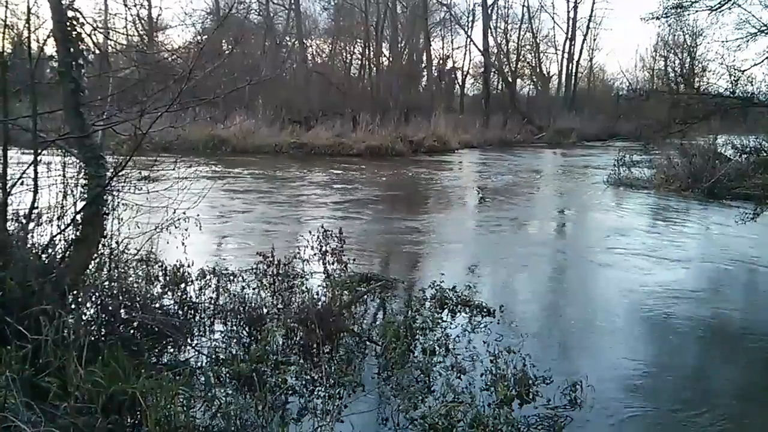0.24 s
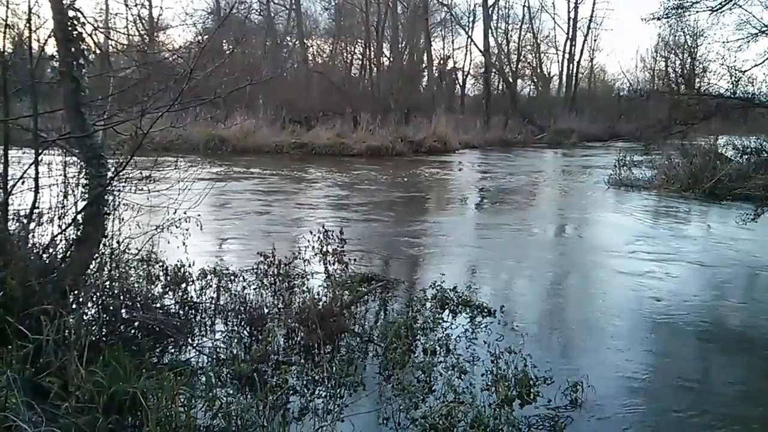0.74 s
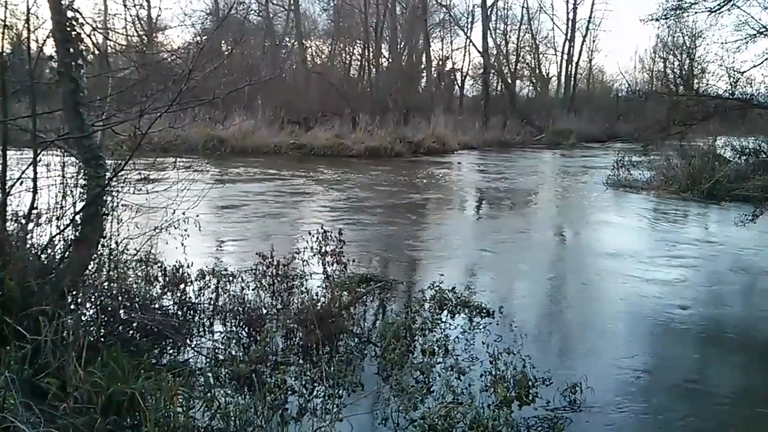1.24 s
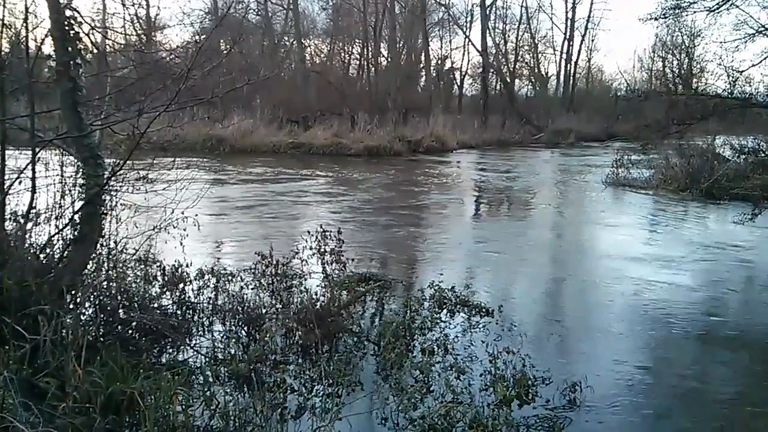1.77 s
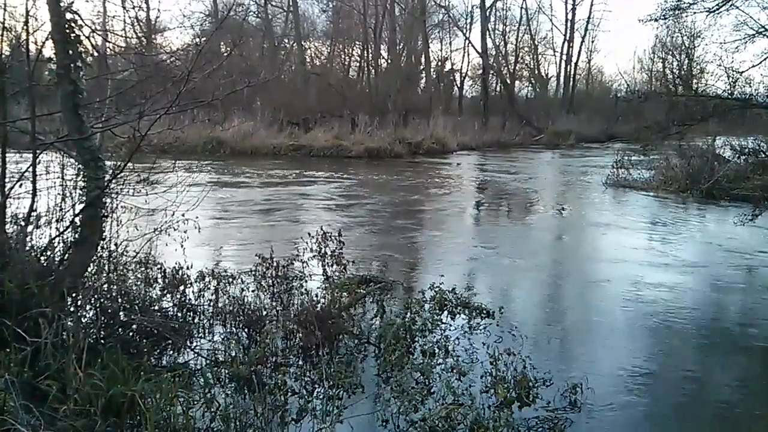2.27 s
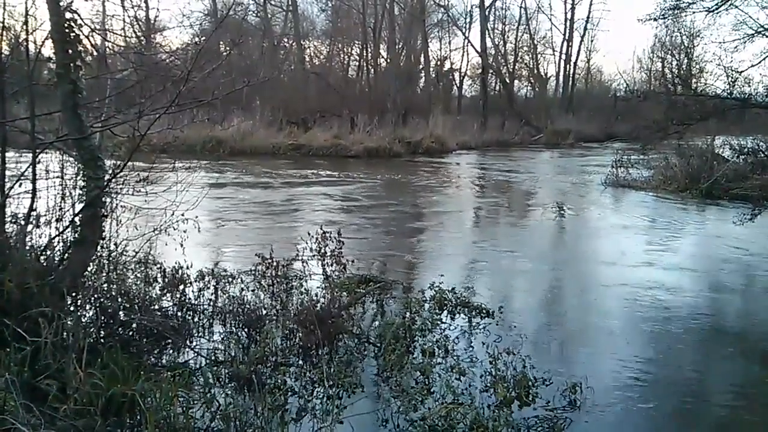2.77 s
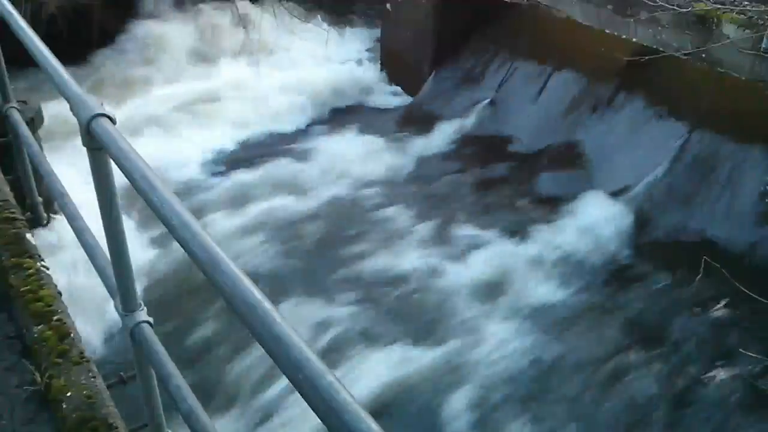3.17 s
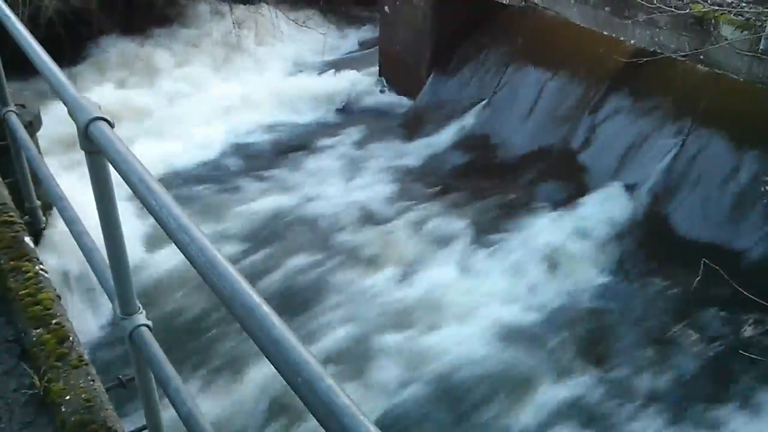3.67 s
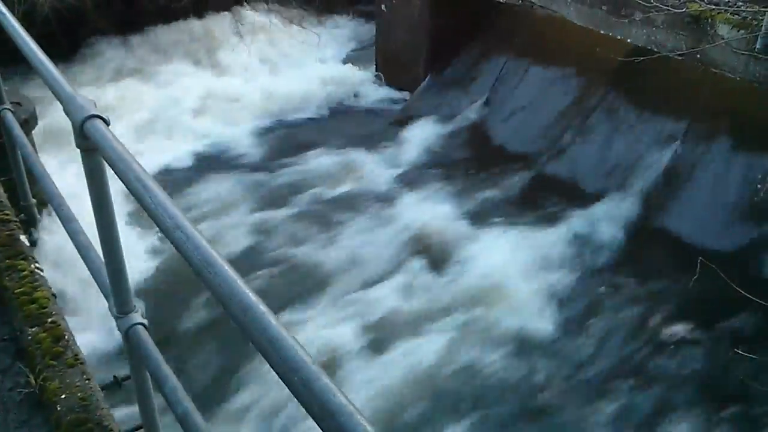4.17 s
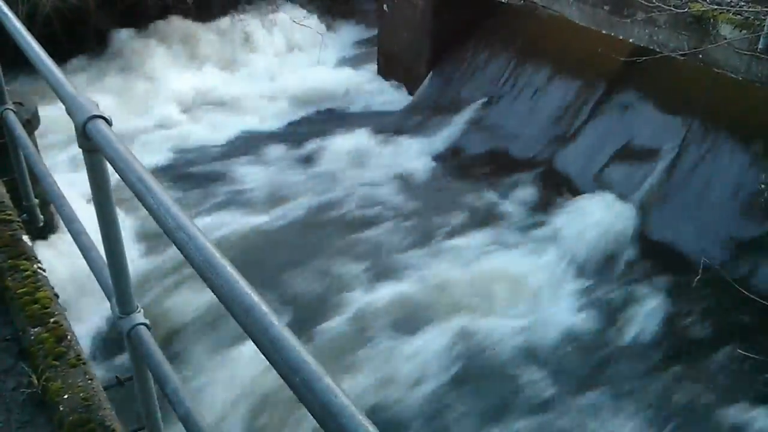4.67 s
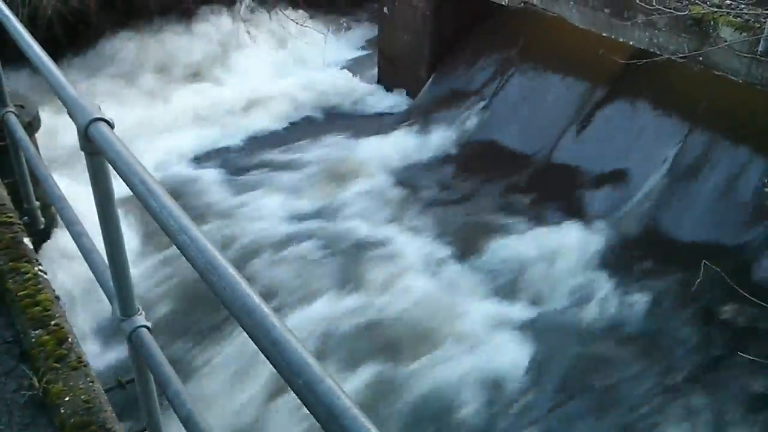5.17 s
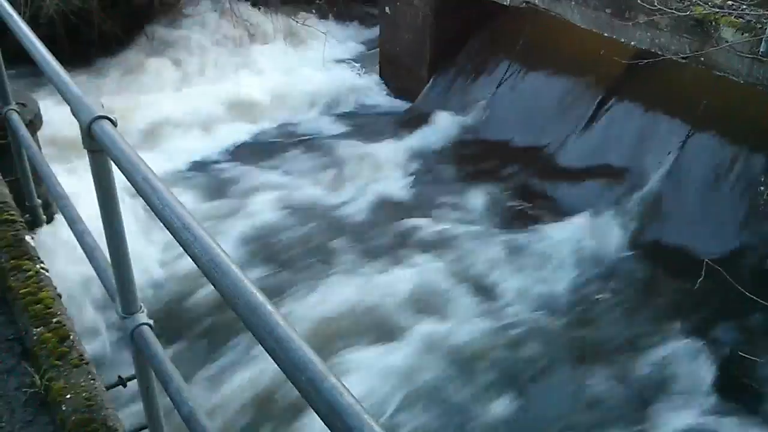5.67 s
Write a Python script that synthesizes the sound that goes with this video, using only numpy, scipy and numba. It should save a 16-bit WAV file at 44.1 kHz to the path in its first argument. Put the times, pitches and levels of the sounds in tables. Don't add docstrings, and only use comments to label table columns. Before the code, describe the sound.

Low, muffled rumble of a distant weir across a calm flooded river, brief total silence, then loud churning white water close by, turning thinner and hissier.

```python
import sys
import numpy as np
from scipy import signal
from scipy.io import wavfile
from scipy.ndimage import uniform_filter1d, map_coordinates
from numba import njit

SR = 44100
rng = np.random.default_rng(int(sys.argv[2]) if len(sys.argv) > 2 else 0)


def ratio(d):
    e = np.asarray(d, float) / 20
    return 10 ** e


def persist_wave(psi):
    counts = np.round(np.clip(psi, -1, 1) * 32767).astype(np.int16)
    wavfile.write(sys.argv[1], SR, np.atleast_2d(counts).T)


N = 261072

BAND_EDGES = [80, 330, 2000, 6000, 15500]
# pitch_hz, density_db (per Hz)
FAR_COLOUR = [(15, -62.5), (25, -23.5), (107, 2), (140, 3), (296, 1), (420, -3.5), (801, -6.5),
              (1110, -15.5), (1330, -16), (2000, -22), (3150, -34), (4240, -27.5), (8080, -18.5),
              (13500, -28), (15400, -35.5)]
NEAR_COLOUR = [(15, -53), (25, -23), (86, -12.5), (140, -3.5), (266, -2), (388, -7.5), (494, -3.5),
               (719, -6), (941, -3), (1140, -5.5), (1610, -4), (2830, -11.5), (5550, -2.5), (10900, -9),
               (15400, -14)]
CLAMPED_COLOUR = [(15, -64), (25, -26), (140, -4.5), (313, -1), (388, -7), (739, -2.5), (1200, -10.5),
                  (1370, -8.5), (1840, -11.5), (2050, -10.5), (2830, -17.5), (4600, -13.5), (7450, -3),
                  (9000, -2), (15400, -11.5)]
# rumble_db, roar_db, rush_db, spray_db
STEADY = [
    (-31, -26, -35.5, -30.5),
    (-22.5, -14.5, -14.5, -15.5),
    (-29, -22.5, -24.5, -15),
]
# centre_s, level_db
HEAVES = [(.19, -1), (.26, 3), (.52, 1), (.64, 4), (.78, 5.5), (.97, 0.5), (1.14, 0.5), (1.36, 1),
          (1.53, 4), (1.65, 4), (1.9, 2), (2.07, 2), (2.43, 3), (3.36, 0.5), (3.52, 1), (3.87, -2),
          (3.96, 2.5), (4.66, 4), (4.77, -2), (4.84, 4), (4.93, 5.5), (5.44, -2), (5.54, -3.5), (5.74, 4.5)]
# centre_s, level_db
SURGES = [(.05, -0.5), (.4, -1.5), (.6, 1.5), (.97, 1.5), (1.6, -2.5), (1.8, 2.5), (3.16, 1.5), (3.99, 1.5),
          (4.07, -0.5), (4.74, -1), (4.9, 0), (5.6, -1)]
# centre_s, level_db, length_s
GUSTS = [(.08, 2, 0.075), (0.302, -1.5, 0.11), (0.696, 1.5, .06), (0.91, -3, 0.046), (1.35, 1.5, 0.039),
         (1.595, -1, .05), (1.84, -4, 0.066), (2.182, 0.8, 0.076), (2.4, -0.5, .04), (3.45, -1, 0.13),
         (3.99, 0.7, .06), (4.402, -1, 0.15), (4.684, 0.5, 0.043)]
# crossover_hz, overlap_octaves
CROSSOVER = [
    (3350, .6),
    (3380, 0.53),
    (3120, .85),
]
WANDER = [.32, .27, .18]
# pitch_hz, level_db
WIDTH = [(25, -10.5), (60, -24), (125, -44), (500, -42.5), (1000, -35), (2500, -17), (4000, -20),
         (6000, -36.5), (12000, -29), (15000, -19.5)]

FRAME = 512
PATH_LAG = 3 * SR // 1000
TOP_HZ = 15760
FADE_OUT_S, FADE_IN_S = (2.561, 2.586), (3.091, 3.121)
CLAMP_START_S, CLAMP_TIME_S = 4.205, 0.069
HEAVE_S, SURGE_S = 0.038, 0.11
RUSH_OF_SURGE, RUSH_OF_GUST, RUSH_OF_BITE = 0.3, 0.55, 0.27
OVERSHOOT_DB, DEEPEST_S, RECOVER_S = -2.0, 4.42, 0.066
CLOSE_TOP_WIDTH_DB = -8.5


@njit
def bubble_rings(start, hz, size, cycles, glide):
    out = np.zeros(N + 40000)
    for k in range(len(start)):
        n = int(cycles * SR / hz[k])
        phase = 0.0
        for i in range(3 * n):
            phase += 2 * np.pi * hz[k] * (1 + glide * i / n) / SR
            swell = min(8.0 * i / n, 1.0)
            out[start[k] + i] += size[k] * np.exp(-2.0 * i / n) * swell * np.sin(phase)
    return out[:N]


def water(count=20000, low_hz=108.25, high_hz=2561.0, scatter_db=2.5, bubble_db=-13.5):
    when, pitch, size = rng.random((count, 3)).T
    start = (when * N).astype(np.int64)
    hz = low_hz * (high_hz / low_hz) ** pitch
    strength = hz * ratio(-scatter_db * np.log(1 - size))
    pops = bubble_rings(start, hz, strength, cycles=8.7, glide=0.12)
    return rng.standard_normal(N) + ratio(bubble_db) * pops / pops.std()


def swells(t, centre_s, db, length_s):
    return (db * np.exp(-0.5 * ((t[:, None] - centre_s) / length_s) ** 2)).sum(axis=1)


def loudness(t, share):
    heave = swells(t, *np.transpose(HEAVES), HEAVE_S)
    surge = swells(t, *np.transpose(SURGES), SURGE_S)
    gust = swells(t, *np.transpose(GUSTS))
    bite = swells(t, np.array([DEEPEST_S]), OVERSHOOT_DB, RECOVER_S)
    rush = RUSH_OF_SURGE * surge + RUSH_OF_GUST * gust + RUSH_OF_BITE * bite
    return np.transpose(STEADY) @ share + np.array([heave + bite, surge + bite, rush, gust])


def on_log(hz, table):
    f, db = np.transpose(table)
    return np.interp(np.log(np.maximum(hz, 1)), np.log(f), db)


def follow(colour_db, hz, levels):
    lift = []
    for lo, hi, db in zip(BAND_EDGES, BAND_EDGES[1:], levels):
        in_band = (hz >= lo) & (hz < hi)
        power = (ratio(colour_db[in_band]) ** 2).sum(axis=0) / len(hz)
        lift.append(db - 10 * np.log10(power))
    lift = np.array(lift)
    centres = np.log(np.sqrt(np.multiply(BAND_EDGES[1:], BAND_EDGES[:-1])))
    log_hz = np.log(np.maximum(hz, 1))
    weights = np.array([np.interp(log_hz, centres, one) for one in np.eye(len(lift))])
    steady = np.clip(1.6 - hz / 60, 0, 0.75)[:, None]
    return colour_db + weights.T @ lift + steady * (uniform_filter1d(lift[0], size=90) - lift[0])


def churn(hz, t, count, rate):
    knots = rng.standard_normal((count, 400))
    rows = np.log(np.clip(hz, 50, None) / 50) / np.log(SR / 100) * (count - 1)
    columns = np.clip(t * rate, 0, 398)
    field = map_coordinates(knots, np.meshgrid(rows, columns, indexing="ij"), order=3)
    return field / field.std()


def ramp(t, t0, t1):
    return np.clip((t - t0) / (t1 - t0), 0, 1)


def viewpoint(t):
    close = t > (FADE_OUT_S[1] + FADE_IN_S[0]) / 2
    clamp = 1 - np.exp(-np.maximum(t - CLAMP_START_S, 0) / CLAMP_TIME_S)
    return np.array([~close, close * (1 - clamp), clamp])


def microphone_paths(hz, t, share, busy):
    cross_hz, overlap = np.transpose(CROSSOVER) @ share
    cross_hz = cross_hz * 2 ** (WANDER @ share * churn(hz, t, count=60, rate=16.0))
    octaves = np.log2(np.maximum(hz, 1)[:, None] / cross_hz)
    turn = np.pi / 4 * (1 + np.tanh(octaves / overlap))
    low = 1 / (1 + (hz / 1500) ** 4)[:, None]
    bass = np.cos(turn) * ratio(busy * 1.6 * low * churn(hz, t, count=30, rate=14.0))
    treble = np.sin(turn) * ratio(0.32 * (1 - low) * churn(hz, t, count=40, rate=11.0))
    return bass, treble * np.exp(0.4j * churn(hz, t, count=60, rate=11.0))


def stereo_width(hz, t, share):
    narrowing = CLOSE_TOP_WIDTH_DB * np.outer(ramp(hz, 5000, 7000), share[0] < 0.5)
    flicker = 6.2 * churn(hz, t, count=40, rate=30.0)
    return ratio(on_log(hz, WIDTH)[:, None] + narrowing - 1.0 + flicker)


def to_frames(x):
    return signal.stft(x, SR, nperseg=2 * FRAME, noverlap=3 * FRAME // 2)


def to_sound(z):
    return signal.istft(z, SR, nperseg=2 * FRAME, noverlap=3 * FRAME // 2)[1][:N]


def scene():
    hz, t, mid = to_frames(water())
    side = to_frames(rng.standard_normal(N))[2]
    share = viewpoint(t)
    busy = 1 - 0.8 * share[1]
    colours = np.array([on_log(hz, c) for c in (FAR_COLOUR, NEAR_COLOUR, CLAMPED_COLOUR)])
    gain = ratio(follow(colours.T @ share, hz, loudness(t, share)))
    gain = gain * ratio(0.74 * busy * churn(hz, t, count=6, rate=17.0))
    bass, treble = microphone_paths(hz, t, share, busy)
    m = np.roll(to_sound(mid * gain * bass), PATH_LAG) + to_sound(mid * gain * treble)
    s = to_sound(side * gain * busy * stereo_width(hz, t, share))
    return np.array([m + s, m - s])


def thin(x, under_db=-5.2, faint_db=-7.0, slope=0.55):
    hz, t, z = signal.stft(x, SR, nperseg=4 * FRAME, noverlap=3 * FRAME)
    power = np.abs(z.mean(axis=0)) ** 2 + 1e-20
    around = uniform_filter1d(uniform_filter1d(power, size=48, axis=0), size=9, axis=1) + 1e-20
    local = uniform_filter1d(uniform_filter1d(power, size=4, axis=0), size=5, axis=1)
    range_db = 10 * np.log10(np.abs(around) / around.mean(axis=0))
    limit_db = np.minimum(under_db - slope * (range_db - faint_db), -3.1)
    limit_db = limit_db + np.clip(hz / 6000 - 1, 0, 1.1)[:, None]
    limit_db = np.minimum(limit_db + 2.2 * churn(hz, t, count=300, rate=13.0), -1.6)
    kept = (local > around * ratio(limit_db) ** 2) | (hz < 600)[:, None]
    z = z * kept * (hz < TOP_HZ)[:, None]
    return signal.istft(z, SR, nperseg=4 * FRAME, noverlap=3 * FRAME)[1][:, :N]


def band_limit(x):
    return signal.sosfilt(signal.butter(12, 16580, fs=SR, output="sos"), x)


def record(dry):
    t = np.arange(N) / SR
    soft = dry / (1 + np.abs(dry / 0.9) ** 5) ** (1 / 5)
    fade_out = np.sin(np.pi / 2 * (1 - ramp(t, *FADE_OUT_S))) ** 4.8
    fade_in = np.sin(np.pi / 2 * ramp(t, *FADE_IN_S)) ** 3.8
    return band_limit(thin(soft) * (fade_out + fade_in))


dry = scene()
out = record(dry)
persist_wave(out)
```